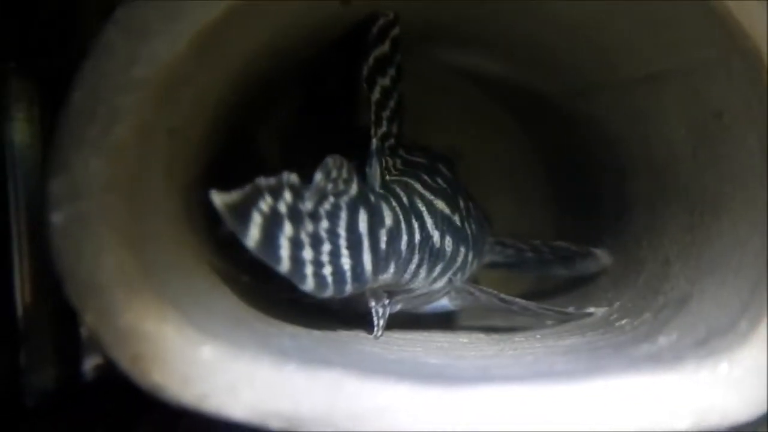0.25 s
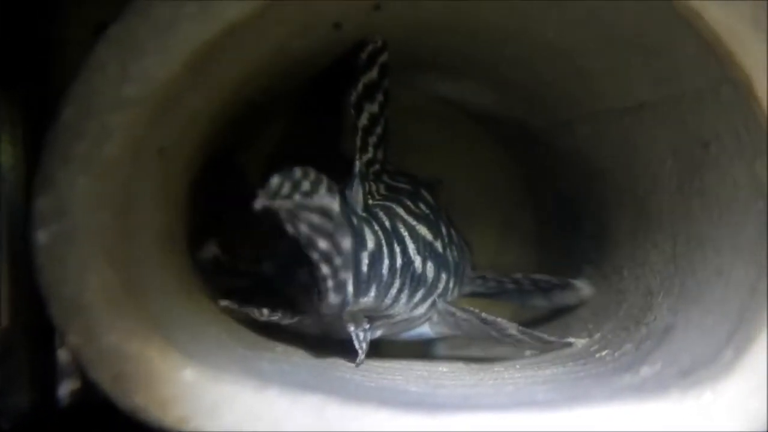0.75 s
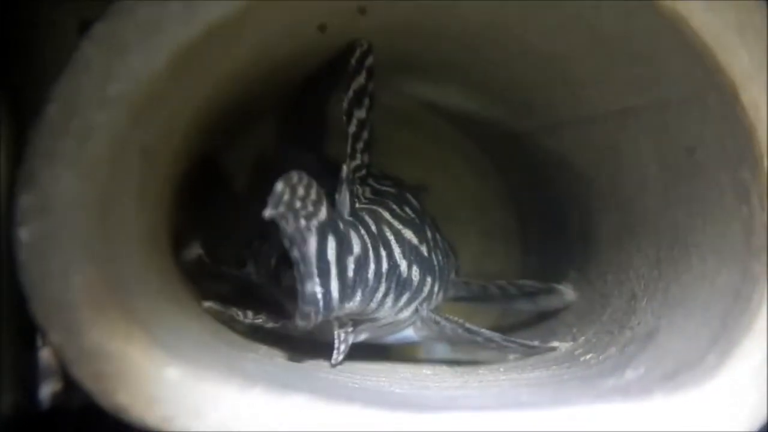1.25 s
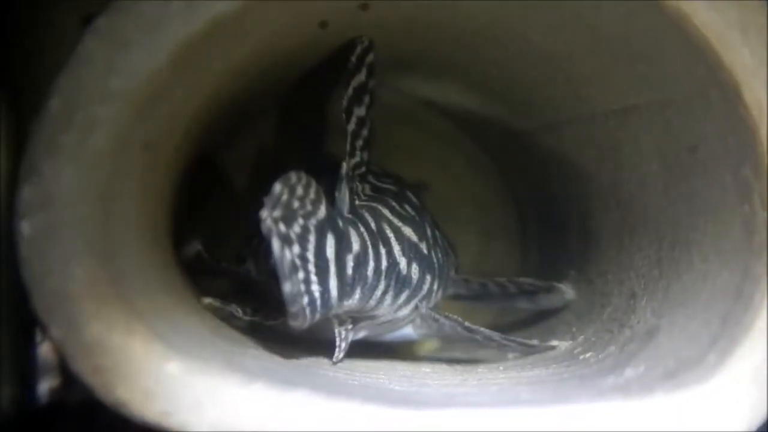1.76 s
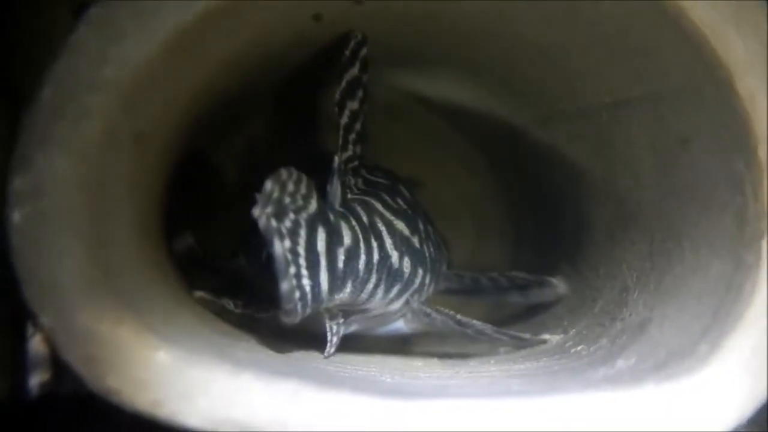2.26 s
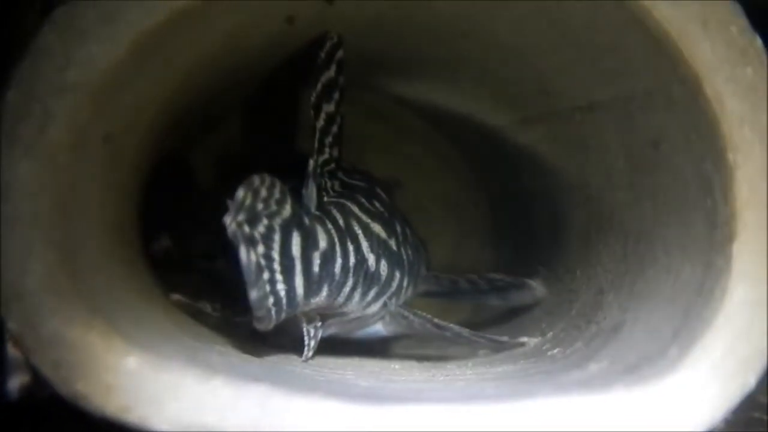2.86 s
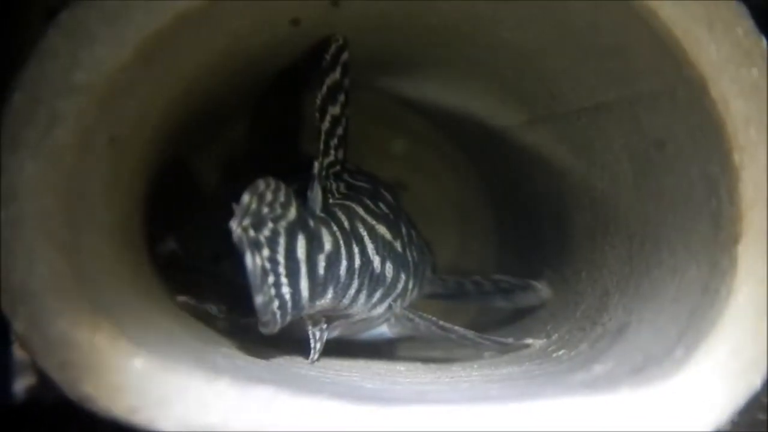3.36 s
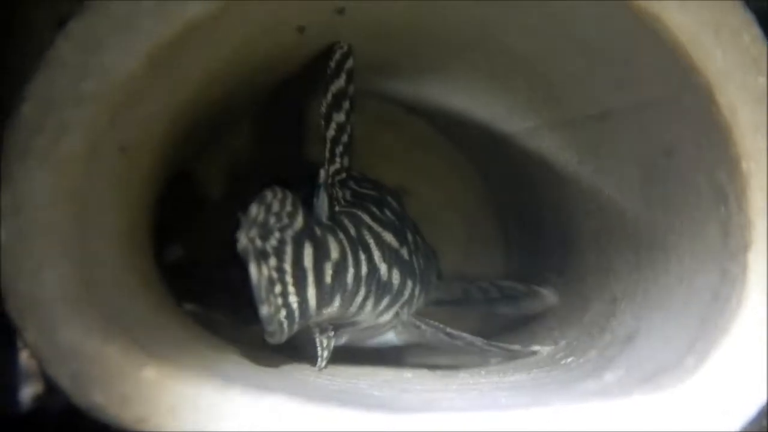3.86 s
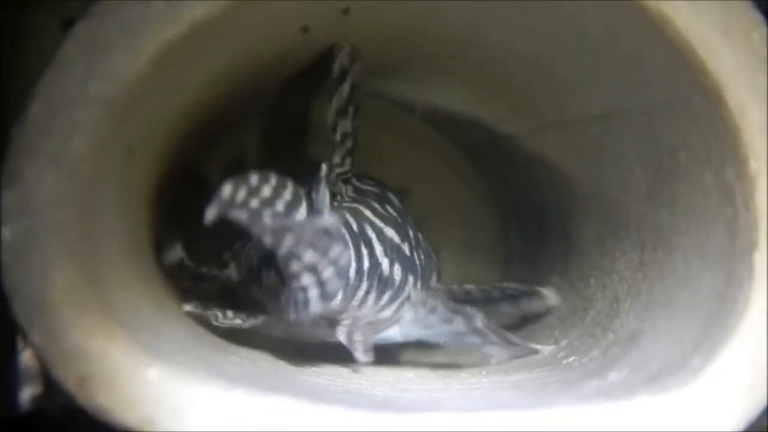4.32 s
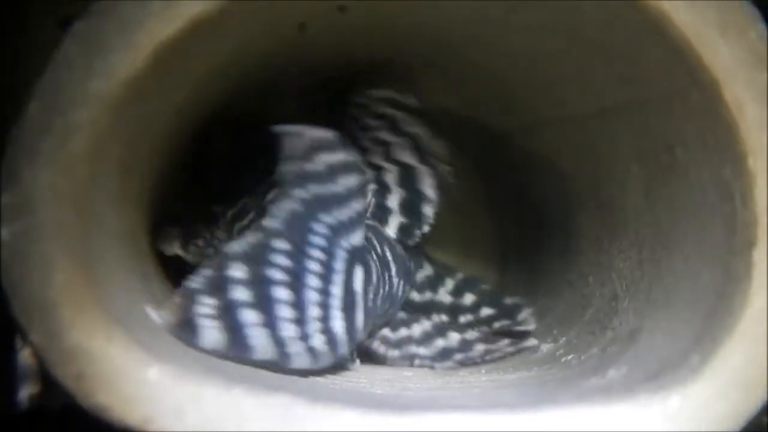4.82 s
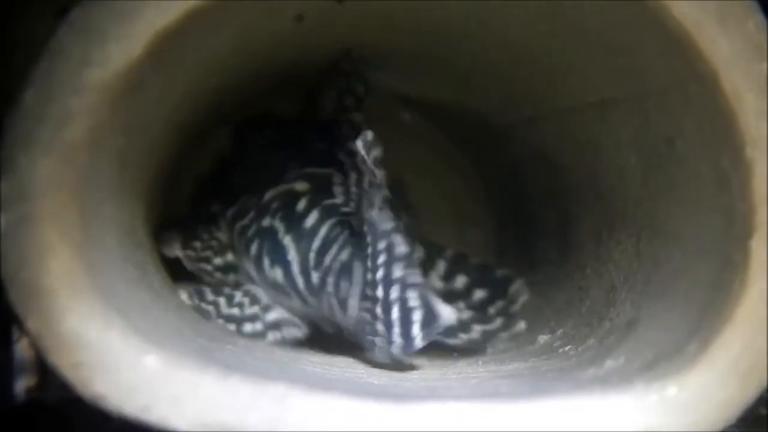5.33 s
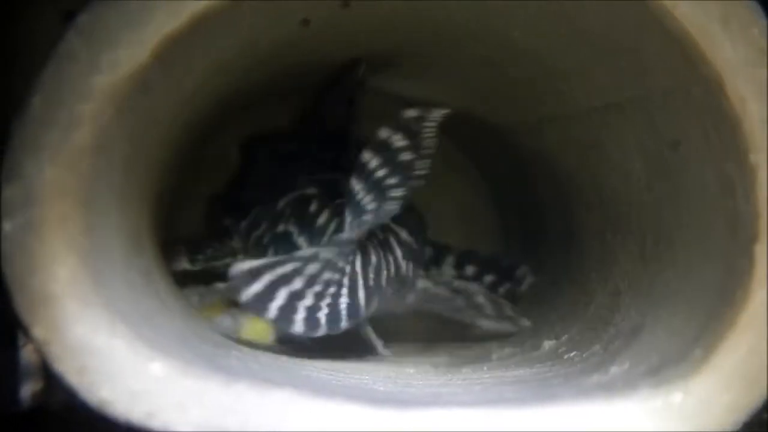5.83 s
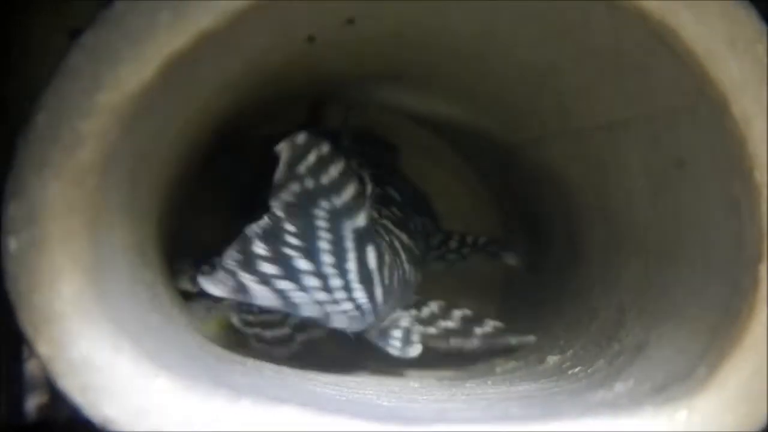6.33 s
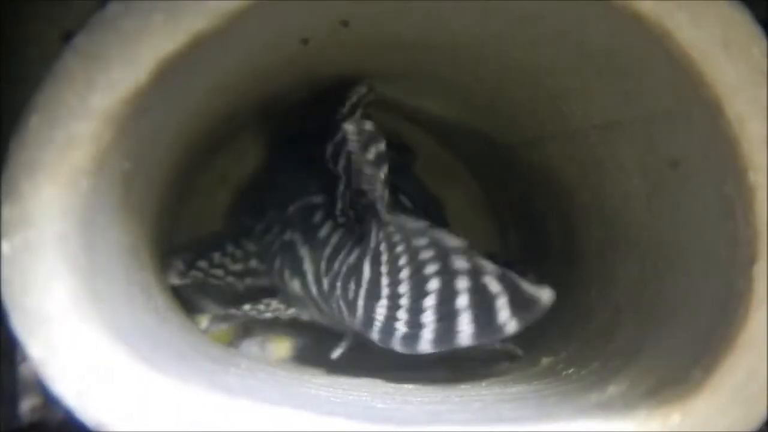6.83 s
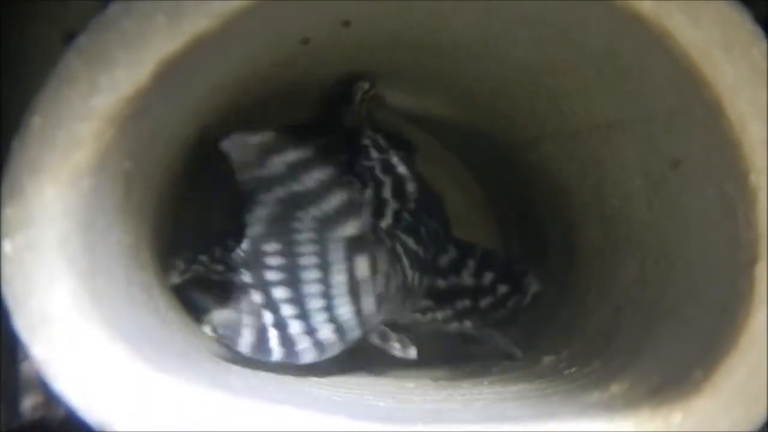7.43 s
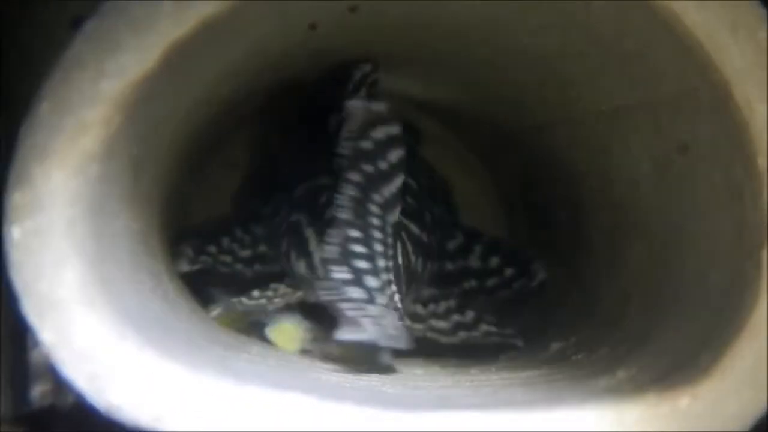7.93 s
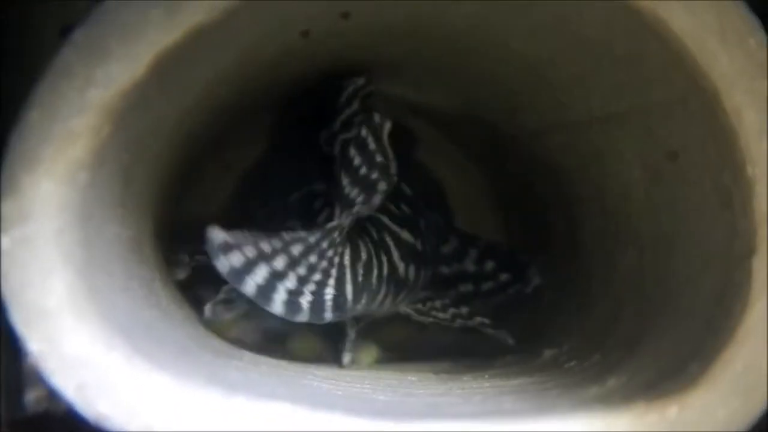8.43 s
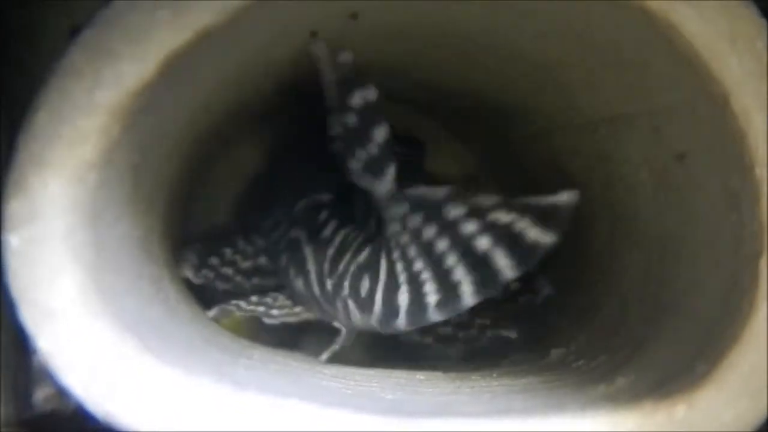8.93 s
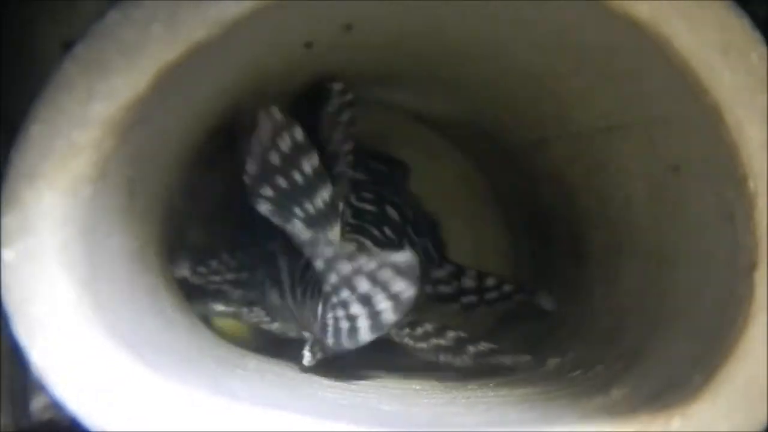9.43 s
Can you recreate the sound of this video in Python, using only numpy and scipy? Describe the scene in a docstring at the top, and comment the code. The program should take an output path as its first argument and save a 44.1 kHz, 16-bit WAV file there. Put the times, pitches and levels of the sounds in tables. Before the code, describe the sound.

A steady mains hum and gritty pump rattle with filter rush and tiny bubbles; small metal like keys clinks now and then.

```python
"""Close to an aquarium: from the start a mains air pump hums and rattles over filter rush and bubbles, under
a faint whine and treble hiss; a rough low rumble opens it. From 0.2 s sudden dips cut the drifting level.
The hum briefly swells and shifts phase in the right ear at 0.33, 0.42 and 4.5 s; small metal, like keys, tinkles
near 0.6, 2, 8.6 and 9.7 s, with a narrow metallic shimmer at 8.7 s; short ticks and puffs come from 2.35 s.
Hum is summed sines, water, hiss and puffs are shaped noise, bubbles, casing and metal are decaying modes."""
import sys
import numpy as np
from scipy import signal
from scipy.fft import rfft, irfft, next_fast_len
from scipy.io import wavfile
from scipy.ndimage import uniform_filter1d

SR = 44100
rng = np.random.default_rng(int(sys.argv[2]) if len(sys.argv) > 2 else 0)


def wav_record(signal):
    """Record a signal, one row per channel, as 16-bit PCM in the file named by sys.argv[1]."""
    frames = np.transpose(np.atleast_2d(signal))
    bounded = np.clip(frames, -1, 1)
    # unit amplitude maps onto the largest positive 16-bit level
    quanta = np.round(bounded * 32767).astype(np.int16)
    wavfile.write(sys.argv[1], SR, quanta)


N = 426888


def gain_of(db):
    """Decibels to an amplitude factor."""
    return 10 ** (np.asarray(db) / 20)


def evened(x):
    """Scales to rms 1."""
    return x / np.sqrt(np.mean(x ** 2) + 1e-20)


def butter(order, hz, kind="lowpass"):
    """A Butterworth filter as second-order sections."""
    return signal.butter(order, hz, kind, fs=SR, output="sos")


def read(points, hz, axis=1):
    """One level column of a spectrum table, interpolated on a log-frequency axis."""
    table = np.transpose(points)
    return np.interp(np.log(hz + 1), np.log(table[0] + 1), table[axis])


def humps(modes, hz):
    """Summed power of a set of resonances."""
    return sum(gain_of(db) ** 2 / (1 + (2 * (hz - f) / width) ** 2) ** 2 for f, width, db in modes)


def wander(hz):
    """Slow random movement of rms 1, with little above the given rate."""
    steps = 2 ** 13
    z = rfft(rng.standard_normal(steps))
    rates = np.arange(len(z)) * SR / N
    slow = evened(irfft(z / (1 + (rates / hz) ** 4), steps))
    return np.interp(np.arange(N), np.linspace(0, N, num=steps), slow)


def tone(hz, phase_turns=0):
    """A sine of rms 1 from a random phase, which may drift, in turns."""
    return np.sqrt(2) * np.sin(2 * np.pi * (hz * np.arange(N) / SR + rng.random() + phase_turns))


def noise(magnitude, size, patch_db, patch_s, patch_hz):
    """Random short-time spectra whose level varies in patches of time and frequency."""
    frames = 4 * N // size + 8
    a, b, patches = rng.standard_normal((frames, size // 2 + 1, 3)).T
    patches = uniform_filter1d(patches, max(1, round(patch_hz * size / SR)), axis=0)
    patches = evened(uniform_filter1d(patches, max(1, round(4 * patch_s * SR / size)), axis=1))
    z = (a + 1j * b) * magnitude[:, None] * gain_of(patch_db * patches)
    return signal.istft(z, nperseg=size, noverlap=3 * size // 4)[1][size:size + N]


def bumps(rows):
    """Sum of smooth rises and falls, from rows of middle, length and height."""
    t = np.arange(N) / SR
    return sum(height * np.cos(np.pi * np.clip((t - s) / length, -.5, .5)) ** 2 for s, length, height in rows)


# slow drift: (t/s, base level/dB, water level/dB and low-treble hiss level/dB above their usual share)
LEVEL_DRIFT = [(0.0, -63, 0.84, -2.5), (0.7, -62.5, 0.43, 1), (1.5, -60.5, 0.017, 0.5),
               (2.6, -62.5, -0.45, 2), (3.2, -61, -0.37, -0.5), (4.2, -62, -0.78, 0.5),
               (4.7, -62, 0.54, -1), (5.6, -62, -0.1, -1), (6.3, -64.5, 0.27, -2.5), (6.9, -61, 0.23, 0.5),
               (7.7, -62, 0.14, 0), (7.95, -61.5, -0.29, 3), (8.6, -63.5, -0.11, 0.5),
               (9.2, -63.5, 0.073, -0.5), (9.45, -62.5, -0.58, 4), (9.68, -62, -0.12, 0)]


def drift(axis):
    """One column of the slow drift, in straight lines between its points."""
    table = np.transpose(LEVEL_DRIFT)
    return np.interp(np.arange(N) / SR, table[0], table[axis])


MAINS_HZ, FLUTTER_HZ = 50.016, 10.0
HUM_DIP_SHARE = 0.84  # how much of each dip the main hum follows
TYPICAL_DB = -60  # base level at which the weaker steady tones have their listed strength
# usual strength of the second, third and fourth mains orders: level/dB
HUM_DB = [-28.5, -54.5, -61.5]
# drift of the second order: (t/s, level/dB)
SECOND_ORDER_DRIFT = [(0.0, -8), (0.03, -14), (0.06, 0.5), (0.13, 0), (0.35, -2), (0.7, -0.5), (2.2, 1),
                      (2.8, -1), (4.0, -0.5), (6.0, 0), (6.6, -1), (7.4, 0.5), (8.0, -0.5), (9.5, 0)]
# the third and fourth orders swell now and then: (middle t/s, length t/s, mains order, rise level/dB)
ORDER_SWELLS = [(0.15, 0.97, 3, 12), (0.172, 0.33, 4, 16.5), (.85, .3, 3, 4), (1.3, 0.64, 3, 5),
                (1.72, 0.73, 3, 15), (3.048, 1, 3, 11), (3.42, 0.46, 3, 5), (3.75, 0.22, 3, 11),
                (4.103, 0.19, 3, 9), (4.443, 0.25, 3, 13), (4.75, 0.65, 3, 12), (5.486, 0.24, 3, 14),
                (6.552, 0.47, 3, 12), (6.868, 0.26, 3, 9), (6.87, .3, 4, 2), (7.238, 0.58, 3, 14.5),
                (8.05, 0.58, 4, 9), (8.455, 0.54, 4, 15), (9.16, 0.67, 4, 12), (9.12, 0.34, 3, 10),
                (9.512, 0.3, 4, 11)]
# weaker orders of the pump: (multiple of the mains, rms level/dB before flutter)
BUZZ_ORDERS = [(1, -74), (6, -60), (8, -62), (9, -57), (10, -58), (12, -57.5), (14, -62.5), (15, -63.5),
               (16, -62), (17, -62), (21, -62), (24, -66), (27, -88), (33, -65.5), (36, -65.5), (37, -77),
               (40, -73), (49, -69), (56, -77)]
# steady tones of a second motor: (f/Hz, rms level/dB)
SECOND_MOTOR = [(40.6, -59), (87.5, -45.5), (525, -67), (725.4, -70)]


def pump(level_db, dip_db):
    """The armature is pulled twice per mains cycle; the weaker orders flutter."""
    t = np.arange(N) / SR
    shapes_db = [np.interp(t, *np.transpose(SECOND_ORDER_DRIFT))]
    for order in (3, 4):
        shapes_db.append(bumps([(s, length, db) for s, length, k, db in ORDER_SWELLS if round(k) == order]))
    main = np.zeros(N)
    flutters_db, phase_wavers = [.35, 1.5, 2.5], [.005, .04, .08]  # rms dB, rms turns
    for order, db, shape_db, flutter_db, turns in zip((2, 3, 4), HUM_DB, shapes_db, flutters_db, phase_wavers):
        order_db = db + shape_db + HUM_DIP_SHARE * dip_db + flutter_db * wander(FLUTTER_HZ)
        main += gain_of(order_db) * tone(order * MAINS_HZ, turns * wander(6.5))
    waver = wander(5.35)  # the armature's timing wavers, more so for the higher orders
    buzz = sum(gain_of(db + 2.3 * wander(16.0)) * tone(round(k) * MAINS_HZ, 0.011 * k * waver)
               for k, db in BUZZ_ORDERS)
    second_motor = sum(gain_of(db) * tone(hz) for hz, db in SECOND_MOTOR)
    return main + (buzz + second_motor) * gain_of(level_db - TYPICAL_DB)


LOW_RUSH_DB, BRIGHT_RUSH_DB, RUMBLE_DB = 19.5, 18.0, 22  # usual shares above the base level
# colour of the water: (f/Hz, relative level/dB per Hz)
RUSH_COLOUR = [(25, -15), (45, -4.5), (61, -10.5), (80, -5.5), (118, -1.5), (140, -3.5), (180, -8.5),
               (240, -15.5), (500, -10), (700, -15.5), (900, -14.5), (1500, -17), (2000, -22),
               (3000, -25.5), (4500, -37), (6000, -48)]
# resonances of the cabinet: (f/Hz, width f/Hz, relative level/dB)
CABINET_MODES = [(96.8, 6.3, 3), (301, 39, -5.5), (410.4, 79, -0.5), (624, 14, -9), (1204, 68, -15),
                 (1493, 83, -17)]


def bubbles():
    """A bubble rings a few cycles and rises in pitch as it nears the surface."""
    out, t = np.zeros(N), np.arange(1500) / SR
    for bubble_hz in np.geomspace(350, 2800, num=16):
        struck = rng.random(N) < 9.0 / SR  # about nine a second of each size
        bursts = struck * gain_of(4.2 * np.minimum(rng.exponential(1, N), 4))
        cycles = bubble_hz * t
        envelope = np.exp(-cycles / 2.9) * (1 - np.exp(-cycles))
        ring = np.sin(2 * np.pi * cycles * (1 + 0.017 * cycles)) * envelope
        out += signal.oaconvolve(bursts, ring)[:N] * (400 / bubble_hz) ** 0.77
    return signal.sosfilt(butter(4, 260, "highpass"), out)


def water(level_db, surge_db, flicker_db):
    """Filter rush through the cabinet's resonances, with small bubbles bursting in it."""
    hz = np.fft.rfftfreq(4096, 1 / SR)
    colour = np.sqrt(gain_of(read(RUSH_COLOUR, hz)) ** 2 + humps(CABINET_MODES, hz))
    patch_db = 1.83 * np.minimum(hz / 500, 1)[:, None]
    rush = noise(colour, size=4096, patch_db=patch_db, patch_s=.08, patch_hz=300)
    rush /= np.sqrt(np.mean(signal.sosfilt(butter(4, [250, 3000], "bandpass"), rush) ** 2))
    rumble = signal.sosfiltfilt(butter(2, 240), rush)
    # only the surface flickers
    splash = (rush - rumble) * gain_of(0.6 * flicker_db) + gain_of(-10.5) * evened(bubbles())
    dull = signal.sosfiltfilt(butter(2, 1000), splash)
    flow_db = level_db + drift(axis=2)
    gurgle_db = 1.38 * wander(20.0)  # the low rush comes in lumps
    low_rush = gain_of(flow_db + LOW_RUSH_DB + gurgle_db) * dull
    bright_rush = gain_of(flow_db + BRIGHT_RUSH_DB + surge_db) * (splash - dull)
    return gain_of(level_db + RUMBLE_DB) * rumble + low_rush + bright_rush


LOW_HISS_DB, HIGH_HISS_DB = 6.5, 7.0  # usual shares above the base level
WHINE_HZ = 14835.2
# whine in the left and right ear: level/dB above the base level
WHINE_DB = [-1, 1.5]
# colour of the microphone hiss: (f/Hz, left relative level/dB per Hz, right relative level/dB per Hz)
HISS_COLOUR = [(2550, -79, -67), (3090, 2.5, 4.5), (4900, 4, 1), (6000, -1.5, 0.5), (6100, 5, 4),
               (8630, 1.5, 3.5), (8700, -1.5, -1.5), (10400, 5.5, 3.5), (11700, 2.5, 7.5), (13300, 7, -7),
               (13700, -10, -10), (14300, -5, -15), (15100, -20, 9), (16100, -13, -4)]
# peaks in the hiss: (f/Hz, width f/Hz, relative level/dB)
HISS_PEAKS = [(5530, 150, 3), (6855, 200, 6), (8420, 160, 5), (9720, 170, 5), (12700, 160, 4),
              (13100, 170, 6)]


def hiss(level_db, flicker_db):
    """Treble hiss, partly shared by the two microphones, and a thin electronic whine."""
    flat = np.ones(1024 // 2 + 1)
    shared, left, right = (noise(flat, size=1024, patch_db=2.0, patch_s=0.11, patch_hz=900) for _ in range(3))
    hz = np.fft.rfftfreq(N, 1 / SR)
    lumps = np.sqrt(1 + humps(HISS_PEAKS, hz))
    ears = [irfft(rfft(own + 0.13 * shared) * lumps * gain_of(read(HISS_COLOUR, hz, axis=k)), N)
            for k, own in ((1, left), (2, right))]
    ears = evened(np.array(ears))
    whine_db = level_db + np.array(WHINE_DB)[:, None] + 1.1 * wander(12.0)
    whine = gain_of(whine_db) * tone(WHINE_HZ)
    # low treble also drifts on its own, high treble follows the base level
    low = signal.sosfiltfilt(butter(2, 8500), ears)
    low_gain = gain_of(level_db + drift(axis=3) + 2.1 * flicker_db + LOW_HISS_DB)
    high_gain = gain_of(level_db + 0.67 * flicker_db + HIGH_HISS_DB)
    return low * low_gain + (ears - low) * high_gain + whine


RATTLE_PER_SURGE = 1.6  # dB of knocking force per dB of surge
# modes of the pump's loose casing: (f/Hz, relative level/dB, t60 t/s)
CASING_MODES = [(1186, 11.5, 0.02), (1523, 9.5, 0.027), (2210, 3, 0.018), (2870, -14, 0.043)]
# the hardest knocks of the casing: (t/s, peak level/dB)
HARD_KNOCKS = [(0.0335, -32.5), (1.861, -35.5), (2.7872, -37), (2.855, -36.5), (3.2227, -39), (3.463, -39),
               (3.753, -34), (4.134, -37), (4.165, -35), (4.762, -39), (4.784, -32.5), (4.803, -36),
               (4.852, -32), (4.873, -33), (5.373, -37), (6.843, -33), (7.003, -36.5)]


def rattle(level_db, surge_db):
    """The casing knocks in step with the armature, every other stroke harder, in short gritty runs."""
    strokes = np.arange(int(N / SR * 2 * MAINS_HZ))
    at = (strokes * SR / (2 * MAINS_HZ)).astype(int)
    force_db = RATTLE_PER_SURGE * surge_db + 9.5 * wander(13.0) - 9.0
    stroke_db = np.minimum(force_db[at] + 4.0 * rng.standard_normal(len(at)), 8)
    knocks = np.zeros(N)
    knocks[at] = gain_of(stroke_db + 3.0 * (-1) ** strokes)
    t = np.arange(2000) / SR
    ring = sum(gain_of(db - 60 * t / t60) * np.sin(2 * np.pi * hz * t) for hz, db, t60 in CASING_MODES)
    ring = np.diff(ring * np.minimum(t / .0015, 1))  # soft contact, and little bass from so small a surface
    s, peak_db = np.transpose(HARD_KNOCKS)
    hard = np.zeros(N)
    hard[(s * SR).astype(int)] = gain_of(peak_db)
    runs = gain_of(level_db - 1.5) * evened(signal.oaconvolve(knocks, ring)[:N])
    return runs + signal.oaconvolve(hard, ring / abs(ring).max())[:N]


# swells of a rough low rumble, as from a hand on the microphone's body: (middle t/s, length t/s, level/dB)
HANDLING_SWELLS = [(0.03, 0.026, -37), (0.124, 0.075, -52), (0.194, 0.095, -39)]
# band of that rumble: lower f/Hz, upper f/Hz
HANDLING_BAND = [120, 300]


def handling():
    """Low band-limited noise under short swells."""
    band = butter(2, HANDLING_BAND, "bandpass")
    swells = bumps([(s, length, gain_of(db)) for s, length, db in HANDLING_SWELLS])
    return swells * evened(signal.sosfilt(band, rng.standard_normal(N)))


DIP_FALL_S, DIP_RECOVER_S = 0.012, 0.063
# the level drops suddenly and creeps back: (t/s, depth level/dB, negative for a lift)
LEVEL_DIPS = [(.23, 4.5), (1.05, 2), (1.27, 2.5), (1.5, 3.5), (1.71, 3.5), (2.23, 2), (2.51, 3), (3.32, 2),
              (3.68, 2.5), (4.23, 2.5), (4.93, 1.5), (5.31, 3), (5.77, 2), (6.1, -1.5), (6.34, 0.5),
              (6.6, 3.5), (7.02, 4), (7.48, 4), (7.7, 3.5), (8.198, 6.5), (8.8, 1.5), (9.12, 3), (9.6, 4)]


def dips():
    """Each dip falls at once and recovers more slowly, in dB."""
    t = np.arange(0, N + 64, 64) / SR
    s, depth_db = np.transpose(LEVEL_DIPS)
    since = np.maximum(t - s[:, None], 0)
    shape = np.minimum(since / DIP_FALL_S, 1) * np.exp(-(since / DIP_RECOVER_S) ** 2 / 2)
    return np.interp(np.arange(N) / SR, t, -depth_db @ shape)


# the hum briefly swells and shifts phase in the right ear, by adding a copy of itself:
# (middle t/s, length t/s, copy's factor on the hum, copy's lead in turns, copy's f/Hz above the hum)
RIGHT_HUM_SWELLS = [(0.331, 0.052, 3.4, .46, 3.0), (0.416, 0.054, 3.0, .44, 2.0),
                    (4.508, 0.052, 3.9, .54, 4.0)]


def swelled_right(hum):
    """A short copy of the hum, turned in phase and slightly raised, adds to it in the right ear."""
    t = np.arange(N) / SR
    analytic_hum = signal.hilbert(hum, next_fast_len(N))[:N]
    swells = sum(bumps([(s, length, factor)]) * np.exp(2j * np.pi * (turns + hz * (t - s)))
                 for s, length, factor, turns, hz in RIGHT_HUM_SWELLS)
    return np.array([hum, hum + (swells * analytic_hum).real])


CLICK_T60_S, RING_RISE_S = 0.039, .003  # the rise is a soft contact
HELD_RING = 0.85  # the pieces touch, which shortens every ring to this share
WAVER, CHATTER, CHATTER_T60_S = .5, .4, .3  # shares of slow waver and of chatter, and the chatter's decay
# the metal's modes: (f/Hz, relative level/dB, t60 t/s before HELD_RING, group of neighbouring modes that a blow
# excites together, starting sign, lag of the right ear in turns)
METAL_MODES = [(3550, -6, .17, 0, 1, 0), (4747, -7, .17, 0, 1, .1), (4840, -4, .21, 0, 1, 0),
               (7680, -4, .35, 1, 1, .28), (9432, 0, .3, 2, 1, .1), (9450, -3, .3, 2, -1, .45),
               (10470, -18, .1, 3, 1, .3), (11070, -4, .14, 3, 1, .3), (11125, 0, .3, 3, 1, .42),
               (13440, 0, .25, 4, 1, .24), (13800, 0, .2, 5, 1, .13), (14350, -8, .08, 4, 1, .2)]
# blows: (t/s, click level/dB, level/dB of each of the six groups 0 to 5,
# then left minus right level/dB of group 2, of group 3 and of the rest)
METAL_BLOWS = [(.645, -67, -75, -75, -67, -54, -71, -67, 0, 2, 0),
               (1.895, -48, -70, -64, -48, -31.5, -64, -49, 1, 1.5, 4),
               (2.111, -41, -76, -70, -55, -31, -69, -56, 2, -0.5, 4),
               (2.374, -58, -75, -73, -68, -47, -73, -57, 0, 18, 3),
               (2.432, -58, -63, -60, -54, -54, -73, -65, -5, 0, -2),
               (2.576, -46, -64, -56, -35.5, -32, -58, -45, 7, 2, 19),
               (2.73, -56, -76, -63, -56, -50, -65, -60, 7, -2, 7),
               (8.512, -45, -46, -49, -41.5, -32.5, -43, -48, 1, 3, 5),
               (8.696, -52, -54, -66, -52, -41, -49, -56, 2, -5, 6),
               (8.7462, -58, -68, -73, -63, -50, -58, -63, 2, 3, 6),
               (9.668, -46, -63, -69, -50, -46, -56, -54, 1, 6, 1)]


def tinkles():
    """Blows click and ring the metal's modes; close pairs beat, swinging wavers and loose pieces chatter."""
    out, t = np.zeros((2, N + SR)), np.arange(SR // 2) / SR
    slow, fast = butter(2, 45.0), butter(2, 170.0)
    side = np.array([[.5], [-.5]])
    for s, click_db, *group_db, pan2_db, pan3_db, pan_db in METAL_BLOWS:
        grit = np.diff(rng.standard_normal((2, len(t) + 1)))
        sound = gain_of(click_db + side * pan_db - 60 * t / CLICK_T60_S) * grit
        for hz, db, t60, group, sign, lag in METAL_MODES:
            a, b, c, d = rng.standard_normal((4, 2, len(t) + 2000))
            waver = signal.sosfilt(slow, a + 1j * b)[:, 2000:]
            chatter = signal.sosfilt(fast, c + 1j * d)[:, 2000:]
            shake = WAVER * waver / waver.real.std()
            shake = shake + CHATTER * gain_of(-60 * t / CHATTER_T60_S) * chatter / chatter.real.std()
            ears = sign * np.exp(-2j * np.pi * lag * np.array([[0], [1]]))
            ring = (np.exp(2j * np.pi * hz * t) * (ears + shake)).imag * np.minimum(t / RING_RISE_S, 1)
            place_db = side * {2: pan2_db, 3: pan3_db}.get(group, pan_db)
            sound = sound + gain_of(group_db[group] + db + place_db - 60 * t / (HELD_RING * t60)) * ring
        at = round(s * SR)
        out[:, at:at + len(t)] += sound
    return out[:, :N]


def room(x):
    """Sparse echoes of random sign that die quickly, other ones for each ear."""
    at = np.arange(100, SR // 3, 20)
    taps = np.zeros((2, SR // 3 + 20))
    places = at + rng.integers(0, 20, (2, len(at)))
    np.put_along_axis(taps, places, rng.choice([-1., 1.], (2, len(at))), 1)
    taps *= gain_of(-60 * np.arange(taps.shape[1]) / SR / 0.23)  # t60 of 0.23 s
    return signal.fftconvolve(x, taps / np.linalg.norm(taps[0]), axes=1)[:, :N]


# the bright rush surges and shakes the casing: (middle t/s, length t/s, level/dB, negative for a lull)
RUSH_SURGES = [(.83, 0.14, 1), (2.45, 0.47, 1.5), (2.8, 0.12, 1), (3.14, 0.14, 4.5), (3.47, 0.15, 4.5),
               (3.76, 0.26, 4), (4.14, .12, 1), (4.82, .25, 0), (5.41, 0.29, 5), (6.5, 0.22, 2.5),
               (6.88, 0.25, -2), (7.85, 0.22, 3.5), (8.15, 0.2, 2.5)]


def surges():
    """Smooth rises of the bright rush, in dB."""
    return bumps(RUSH_SURGES)


# short ticks and puffs of noise, and one narrow metallic shimmer at 8.695 s:
# (t/s, level/dB of the noise before its band filter, centre f/Hz, t60 t/s, width in octaves)
NOISE_PUFFS = [(2.354, -36, 12000, .008, .8), (4.5, -45.5, 5000, 0.12, 1.8), (8.32, -55, 11000, 0.044, 2.1),
               (8.474, -43, 7000, 0.18, 1.8), (8.695, -38.5, 4700, .4, .25),
               (8.968, -44.5, 6000, 0.19, 1.5), (9.317, -51, 12000, .03, 2.1)]


def ticks_and_shimmer():
    """Decaying band-limited noise: broad bands tick and puff, the narrow long one shimmers like metal."""
    out, t = np.zeros((2, N + SR)), np.arange(SR // 4) / SR
    for s, db, hz, t60, octaves in NOISE_PUFFS:
        half = 2 ** (octaves / 2)
        band = butter(2, [hz / half, min(hz * half, .45 * SR)], "bandpass")
        puff = signal.sosfilt(band, rng.standard_normal((2, len(t))))
        at = round(s * SR)
        out[:, at:at + len(t)] += gain_of(db - 60 * t / t60) * puff
    return out[:, :N]


def scene():
    """Apart from the right-ear swells, hum, rattle and water reach both ears alike; only the treble is wide."""
    near = tinkles() + ticks_and_shimmer()
    near = near + gain_of(-1.5) * room(near)
    mid = near.mean(0)
    wide = signal.sosfilt(butter(4, 2700, "highpass"), near - mid)
    flicker_db = wander(12.0)  # water and hiss brighten and dim together over a wide band
    dip_db, surge_db = dips(), surges()
    level_db = drift(axis=1) + dip_db
    machines = swelled_right(pump(level_db, dip_db)) + rattle(level_db, surge_db)
    steady = water(level_db, surge_db, flicker_db) + hiss(level_db, flicker_db)
    return machines + steady + mid + wide + handling()


EDGE_HZ = 15770


def record(dry):
    """The microphone loses the deepest bass; then the band limit removes the highest treble."""
    thin = signal.sosfilt(butter(4, 37.0, "highpass"), dry)
    band_limit = signal.firwin(1023, EDGE_HZ, window=("kaiser", 9), fs=SR)
    return signal.oaconvolve(thin, band_limit[None], "same")


dry = scene()
out = record(dry)
wav_record(out)
```